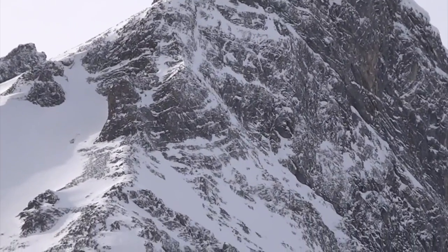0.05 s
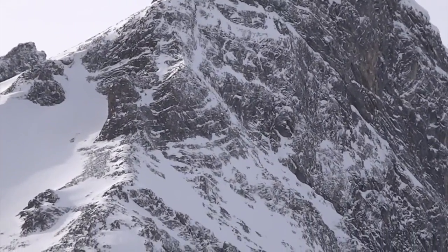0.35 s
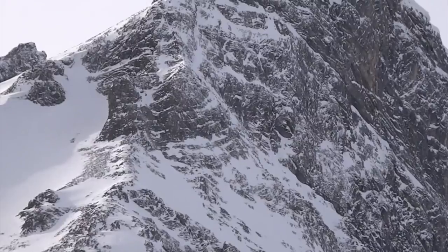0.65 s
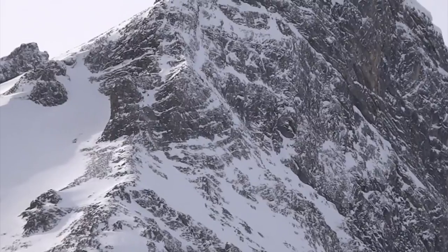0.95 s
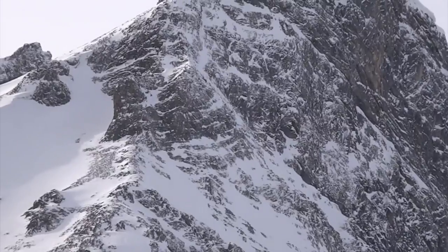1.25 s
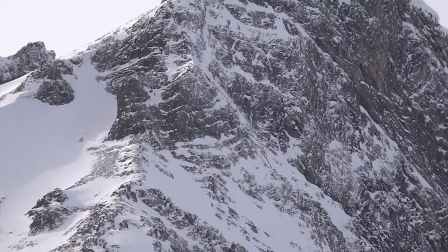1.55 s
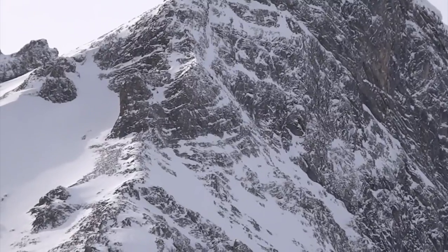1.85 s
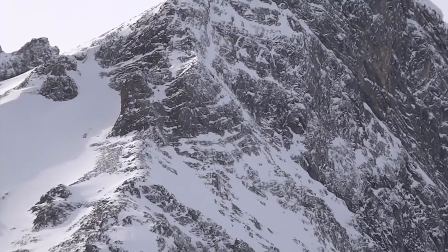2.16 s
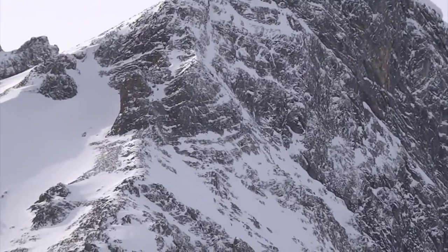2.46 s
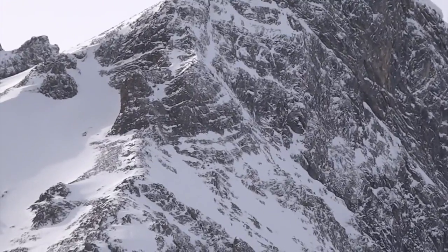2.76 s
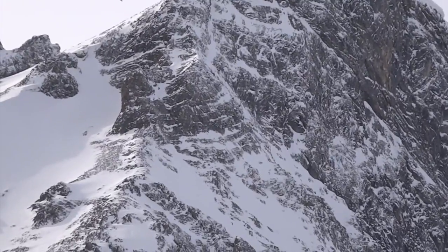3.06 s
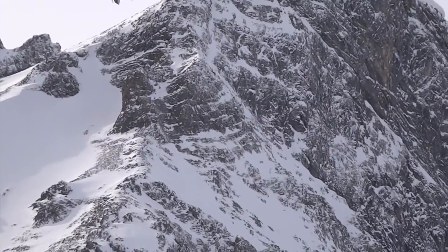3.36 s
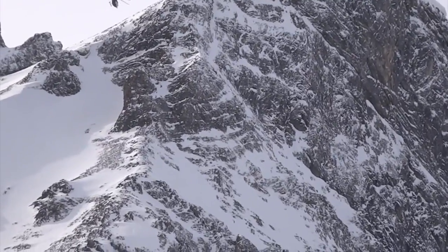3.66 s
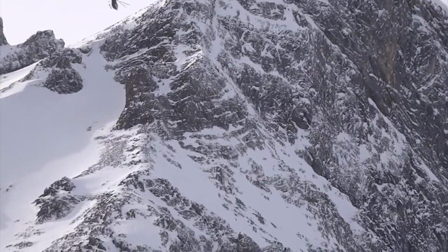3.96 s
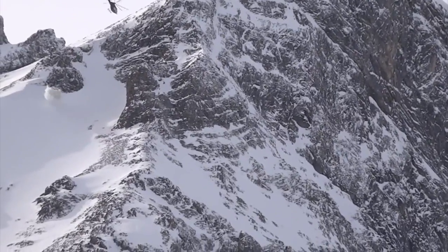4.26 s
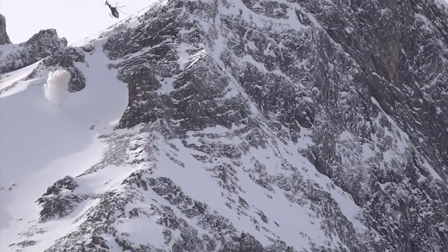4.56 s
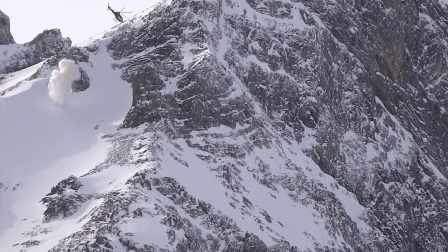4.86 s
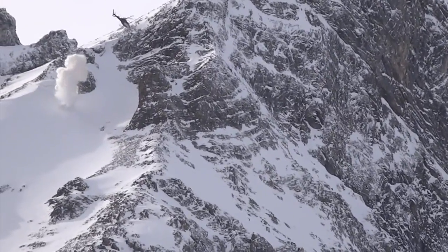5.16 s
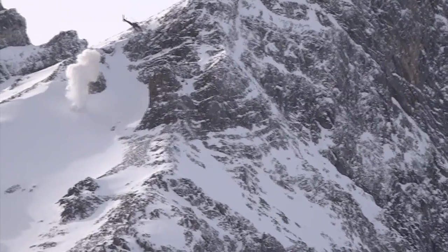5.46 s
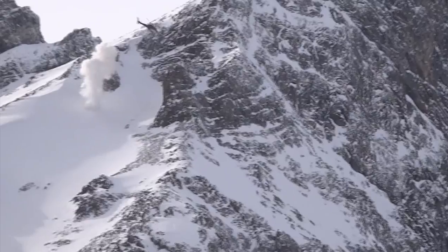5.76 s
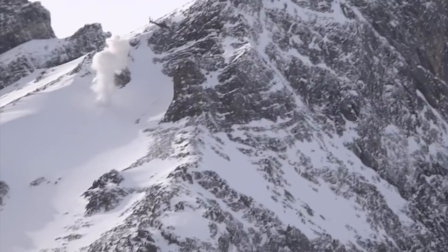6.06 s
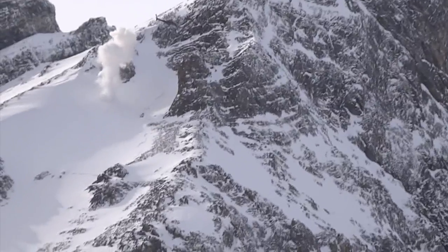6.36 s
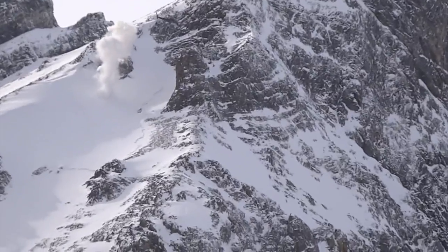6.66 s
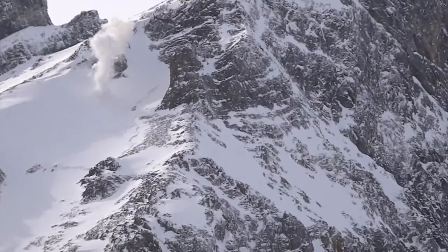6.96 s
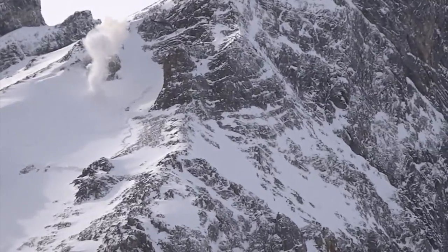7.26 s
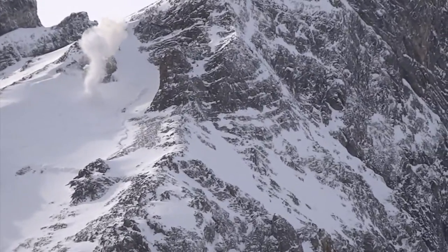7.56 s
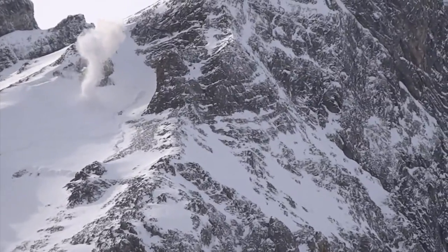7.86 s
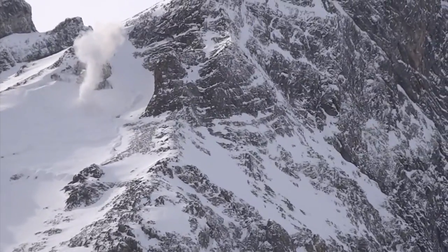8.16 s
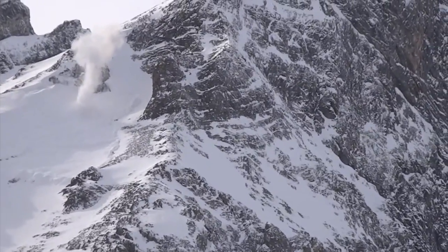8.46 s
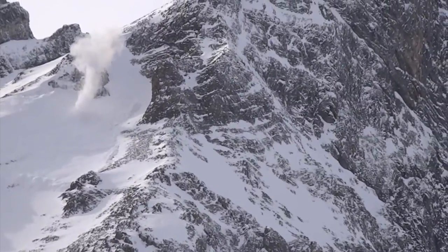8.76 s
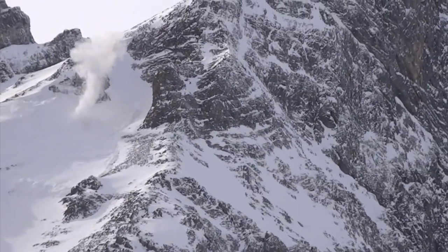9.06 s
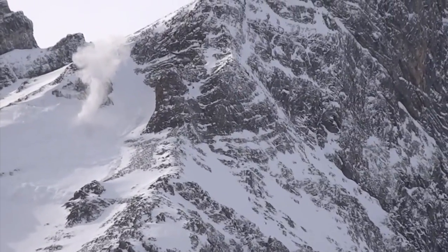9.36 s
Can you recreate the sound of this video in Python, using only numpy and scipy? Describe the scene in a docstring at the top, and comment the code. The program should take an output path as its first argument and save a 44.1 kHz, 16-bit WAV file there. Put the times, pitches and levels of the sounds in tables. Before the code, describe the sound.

From the start, wind rumbles and flutters on the microphone in open mountain air, with irregular low buffets and pops through the first eight seconds. A distant helicopter circles throughout, its rapid chopping roar carrying a soft swish that glides up and down. It swells at about 2.5 seconds, with blade slaps from 2.8 to 3.6, slaps again most clearly between 5.7 and 7.1, and recedes by 8. At about 8.3 seconds an explosive charge detonates on the slope, the loudest event: a sudden bang with a deep boom, thumps and a dull roll. At 8.8 a rock face throws back a bright, crackling echo in several quick surges, followed by small knocks and a fading rumble that continues to the end at around 9.6 seconds. A very faint camera whirr, hiss and thin whine lie underneath.

```python
"""Wind buffets the microphone while a distant helicopter circles over a snowy mountain.
Eddies press on the two microphone ports; the blades chop their own airflow noise and slap their wake.
Near the end an explosive charge goes off on the slope: the shock arrives, rolls dully over the snow,
and half a second later a rock face throws it back as a bright, crackling echo.
A limiter holds the blast down, and the camera's faint whirr, hiss and whine lie underneath."""
import sys
import numpy as np
from scipy import signal
from scipy.fft import rfft, irfft, next_fast_len
from scipy.io import wavfile
from scipy.ndimage import uniform_filter1d, map_coordinates

SR = 44100
rng = np.random.default_rng(int(sys.argv[2]) if len(sys.argv) > 2 else 0)


def transcribe(u):
    """Save the signal u as a 16-bit wav file named by the first command-line argument.

    u: samples, shape (n,) or (channels, n), limited to [-1, 1]; the rate is SR.
    q: integer samples, one column per channel.
    """
    v = np.clip(np.atleast_2d(u).T, -1, 1)
    q = np.round(v * 32767).astype(np.int16)
    wavfile.write(sys.argv[1], SR, q)


N = 424065
T = np.arange(N) / SR
BLAST_S = 8.268


def helicopter():
    """Amplitude modulation: each blade passage pulses the airflow noise, heard with slaps and tones."""
    # progress of the main rotor: time_s, passage_count
    blades = [(0, 0), (2.418, 46), (2.886, 55), (3.556, 68), (5.845, 112), (6.467, 124), (6.999, 134),
              (7.941, 152), (8.204, 157), (9.62, 184)]
    # loudness as it circles nearer and farther: time_s, roar_db, swish_db
    flight = [(0, -35, -57), (.6, -37.5, -56), (1.1, -37, -46.5), (1.6, -40.5, -51.5), (2.5, -31, -41.5),
              (3.1, -34.5, -47), (4.1, -40, -54), (5.1, -34, -48.5), (5.6, -33.5, -52), (6.1, -37.5, -47),
              (6.8, -34, -49.5), (7.2, -36.5, -48.5), (7.55, -39.5, -54), (8.1, -46.5, -50.5)]
    # spectra of the low roar and the higher swish: frequency_hz, level_db
    roar_tone = [(150, -4.5), (270, -27), (355, 1), (450, -7), (545, 0.5), (700, -6.5), (800, -10.5),
                 (870, -20), (1100, -30), (1600, -67.5)]
    swish_tone = [(600, -23), (850, -0.5), (930, 1), (1170, -7), (1290, -17.5), (1450, -21.5), (1680, -26),
                  (1800, -31.5), (2400, -49.5), (4000, -71)]
    passages = np.interp(T, *np.transpose(blades))
    roar_gain, swish_gain = levels(flight)
    chop = unit(1 + 0.3 * blade_gate(passages, width=0.15))
    roar = amp(0.5) * roar_gain * noise(roar_tone, side_db=-33.5)
    swish = amp(-1.5) * swish_gain * noise(swish_tone, side_db=-16)
    airflow = chop * (roar + swish + tip_swish() + banking_swish())
    tones = rotor_tones(passages)
    return slope_reflection(airflow) + wake_slaps(passages) + vortex_slaps() + tones


def tip_swish():
    """Directivity: the hiss of the blade tips swells when it is beamed towards the listener."""
    # swells: start_s, hold_s, level_db
    swishes = [(2.38, .6, -61.5), (4.854, 0.5, -67.5), (5.72, .25, -65.5)]
    # tip noise spectrum: frequency_hz, level_db
    tip_tone = [(1100, -11), (1330, -5.5), (1420, -9), (1560, 0), (1690, 4), (1800, -8), (2200, -18),
                (2700, -39)]
    gain = power_sum(swell(s, db, 0.1, hold_s, 0.15) for s, hold_s, db in swishes)
    return gain * noise(tip_tone, side_db=-12)


def banking_swish():
    """Band-pass noise: a soft spectral peak glides up and down as the helicopter banks."""
    # path of the peak: time_s, centre_hz, level_db
    glide = [(0, 698, -55), (.95, 810, -48.5), (1.249, 1200, -57), (1.65, 1114, -56), (2.05, 860, -51.5),
             (2.3, 960, -47.5), (2.5, 1155, -54.5), (3.4, 1100, -59.5), (4.3, 1047, -58), (4.9, 1580, -74),
             (5.65, 1697, -70), (6, 1460, -65.5), (6.2, 1306, -58), (6.45, 1028, -49.5), (6.75, 1340, -62),
             (7.1, 1400, -61), (7.6, 1500, -75)]
    s, hz, db = np.transpose(glide)
    air = ports(rng.standard_normal((2, N)), side_db=-15)
    return amp(np.interp(T, s, db)) * resonate(air, np.interp(T, s, hz), width_hz=230)


def rotor_tones(passages):
    """Scintillation: turbulent air makes the tones of both rotors fade and wander in phase."""
    # partials: blade_rate_multiple, level_db
    partials = [(2, -34.5), (3.05, -43), (4, -43.5), (7.04, -41), (10.56, -39), (14.08, -56), (17.6, -44.5)]
    tones = np.zeros(N)
    for multiple, db in partials:
        gain = amp(db + 3.2 * drift(per_s=4.6))
        cycles = multiple * passages + 0.094 * drift(per_s=6)
        tones += gain * np.sin(2 * np.pi * cycles)
    return tones


def slope_reflection(direct):
    """Comb filtering: sound interferes with its reflection off the snow, whose path slowly changes."""
    delay_s = 0.005 + 0.0012 * uniform_filter1d(drift(per_s=1.5), size=16384)
    reflected = np.array([np.interp(T - delay_s, T, port) for port in direct])
    return direct.std() * unit(direct + amp(-11) * reflected)


def wake_slaps(passages):
    """Multipath: a blade strikes its wake, and the pulse arrives by several paths in a turbulent puff."""
    # paths, direct and off the slopes: delay_blade_periods, level_db
    paths = [(-.05, -5.5), (0, -0.5), (.045, -4), (.11, -8.5)]
    # slap spectrum: frequency_hz, level_db
    slap_tone = [(60, -15), (250, -1.5), (350, 10.5), (440, 0), (550, 9), (720, 3.5), (850, -4.5),
                 (940, 1.5), (1150, -5), (1380, -25), (1620, -23.5), (1800, -32), (2100, -38), (3000, -70)]
    # bouts of slapping: start_s, hold_s, level_db
    bouts = [(2.787, 0.78, -40), (4.946, 0.14, -49), (5.68, 0.044, -35), (5.843, 0.24, -33.5),
             (6.1, 0.11, -32.5), (6.31, 0.22, -35), (6.89, 0.2, -37), (7.934, 0.054, -40.5),
             (8.192, .05, -37.5)]
    clicks = np.zeros(N)
    for delay, db in paths:
        arrived = np.floor(passages - delay + 0.0082 * drift(per_s=9))
        clicks += amp(db) * np.diff(arrived, prepend=0)
    puffs = amp(-6) * blade_gate(passages, width=0.09) * noise(slap_tone, side_db=-16.5)
    swells = [swell(s, db, 0.11, hold_s, 0.069) for s, hold_s, db in bouts]
    gain = amp(-2) * power_sum([amp(-47.5), *swells])
    return gain * (colour(clicks, slap_tone) + puffs)


def vortex_slaps():
    """Blade-vortex interaction: cutting a tip vortex sends a tiny shock, doubled by the ground."""
    # strikes: time_s, level_db
    strikes = [(3.042, -16), (5.682, -29), (5.845, -21), (5.895, -19), (5.948, -19), (5.997, -20),
               (6.103, -14), (6.154, -10.5), (6.206, -16), (6.312, -16), (6.412, -22), (6.516, -23),
               (6.837, -23), (6.949, -22), (6.998, -20), (7.942, -18), (7.994, -20), (8.202, -26)]
    length_s, cutoff_hz, ground_delay_s = 0.00026, 1150, 0.00269
    cracks = n_waves([(s, db, length_s, cutoff_hz) for s, db in strikes], order=8)
    return cracks + amp(-3) * np.interp(T - ground_delay_s, T, cracks)


def blast():
    """Shock propagation: the charge's N-waves arrive first, then the terrain returns their sound."""
    # shocks, direct and off the nearest slopes: start_s, level_db, overpressure_s, cutoff_hz
    shocks = [(8.2678, -7, 0.002, 1650), (8.2729, -0.5, 0.0025, 450), (8.283, -1.5, 0.0092, 300),
              (8.3145, -2.5, 0.0094, 250), (8.336, -4.5, 0.012, 302), (8.3492, -4, .00025, 1700),
              (8.353, -20.5, 0.00068, 5500), (8.369, -1.5, .017, 200), (8.4135, -3, 0.0087, 200),
              (8.487, -8.5, 0.011, 200), (8.8183, -9, 0.00027, 1790), (8.823, -7.5, 0.00039, 1980),
              (8.886, -12.5, .0004, 2860)]
    return (n_waves(shocks, order=2) + snow_roll() + rock_echoes() + crag_knocks()
            + shock_tearing() + terrain_thumps())


def snow_roll():
    """Reverberation: snow absorbs the treble, so slope and valley return a deep boom and a dull roll."""
    # spectra of boom and roll: frequency_hz, level_db
    boom_tone = [(8, -12), (22, -3), (36, 0), (60, -2), (100, -12), (300, -50), (1500, -120)]
    roll_tone = [(40, -2.5), (100, -3), (140, -4), (200, -1.5), (300, -7), (500, -9.5), (750, -14),
                 (1200, -25.5), (2000, -48), (3500, -65.5), (8000, -89.5)]
    boom = blast_decay(-14, rise_s=0.02, hold_s=0.14, t60_s=1.5) * noise(boom_tone, side_db=-12)
    slope = blast_decay(-7.5, rise_s=0.05, hold_s=0.1136, t60_s=2.1)
    valley = blast_decay(-34, rise_s=0.3, hold_s=0.38, t60_s=5.4)
    roll = power_sum([slope, valley]) * scatter(roll_tone, per_s=1500, spread_db=1, side_db=-20)
    return boom + roll


def rock_echoes():
    """Scattering: each rock face returns a rush of sharp little echoes as the front sweeps over it."""
    # echoes of the faces: peak_s, rush_db, crackle_db, rise_s, t60_s
    faces = [(8.3, -22, -35, .02, 0.61), (8.345, -22, -35, 0.017, 0.11), (8.502, -24, -30, 0.058, 0.094),
             (8.57, -29, -45, .05, .4), (8.715, -31.5, -52.5, 0.046, 0.41),
             (8.813, -12, -24.5, 0.015, 0.068), (8.883, -13.5, -22, 0.025, 0.081),
             (8.97, -19, -27, 0.06, 0.56), (9.03, -16, -25.5, 0.051, 0.47), (9.2, -27, -43.5, .12, 4.8)]
    # spectra of rush and crackle: frequency_hz, level_db
    rush_tone = [(40, 3.5), (150, -14.5), (330, 5.5), (520, 4.5), (800, -2.5), (1300, -7), (2000, -24),
                 (3000, -43), (4200, -62.5), (8000, -76)]
    crackle_tone = [(300, -32), (1300, 13), (2600, -0.5), (4000, -18.5), (6500, -30.5), (10000, -57),
                    (16000, -42.5)]
    rushes, crackles = [], []
    for s, rush_db, crackle_db, rise_s, t60_s in faces:
        fall_s = t60_s / np.log(1000)
        rushes.append(swell(s, rush_db, rise_s, 0, fall_s))
        crackles.append(swell(s, crackle_db, rise_s, 0, fall_s / 1.05))  # air absorbs treble sooner
    diffuse = blast_decay(-26, rise_s=1, hold_s=1, t60_s=4)
    rush = power_sum([diffuse, *rushes]) * scatter(rush_tone, per_s=6000, spread_db=2, side_db=-14.5)
    crackle = power_sum(crackles) * scatter(crackle_tone, per_s=4000, spread_db=3, side_db=-11)
    return (amp(-2) * rush + amp(-5.5) * crackle) * (T > BLAST_S)


def crag_knocks():
    """Discrete echoes: single crags each return one short knock."""
    # knocks: time_s, level_db, length_s, cutoff_hz
    knocks = [(8.274, -11.5, 0.0053, 1100), (8.298, -10, 0.0074, 1200), (8.325, -12.5, .006, 1300),
              (8.35, -14, 0.0037, 6000), (8.578, -9, 0.0059, 650), (9.033, -23, 0.0027, 3980),
              (9.068, -17, 0.0037, 800), (9.183, -17.5, 0.01, 650), (9.213, -15.5, 0.0042, 1800),
              (9.271, -20.5, .003, 4000), (9.325, -15.5, 0.0061, 1700), (9.444, -24, 0.0047, 1200),
              (9.589, -19.5, 0.0062, 650)]
    # knock spectrum: frequency_hz, level_db
    knock_tone = [(200, 2), (700, 10), (1600, -7.5), (2500, -14), (3800, -35), (6000, -45), (10000, -66)]
    crags = noise(knock_tone, side_db=-21.5)
    return sum(low_pass(bumps([(s, db, length_s)]) * crags, cutoff_hz, order=2)
               for s, db, length_s, cutoff_hz in knocks)


def shock_tearing():
    """Fine structure of a ragged shock: dense tiny impulses tear briefly behind the front."""
    # tears: time_s, level_db, length_s
    tears = [(8.282, -45, 0.029), (8.326, -45, 0.038)]
    # tearing spectrum: frequency_hz, level_db
    tear_tone = [(800, -5), (2000, 6), (4000, -7), (6500, -18), (10000, -24), (16000, -33)]
    return bumps(tears) * scatter(tear_tone, per_s=2800, spread_db=5, side_db=-15)


def terrain_thumps():
    """Low-frequency reflection: the terrain throws the blast back as separate thumps."""
    # thumps: time_s, level_db, length_s
    thumps = [(8.272, -8.5, 0.0086), (8.298, -6, 0.015), (8.385, -16, .012), (8.445, -8, 0.03),
              (8.49, -13, 0.017), (8.56, -15, 0.031), (8.632, -7.5, 0.036), (8.685, -12.5, 0.017),
              (8.732, -12, 0.026), (9.03, -22, 0.02), (9.385, -25, 0.017), (9.48, -24.5, 0.023)]
    # thump spectrum: frequency_hz, level_db
    thump_tone = [(50, -19.5), (120, 3), (175, 6.5), (220, -3.5), (300, -14), (700, -34.5), (2000, -87)]
    return bumps(thumps) * noise(thump_tone, side_db=-1)


def bright_spits():
    """Broadband transients: brief bursts of bright, clipping-like noise at the start of the blast."""
    # spit spectrum: frequency_hz, level_db
    spit_tone = [(2000, -15), (5000, -11), (8000, -8.5), (13000, -12), (16000, -9)]
    # spits: time_s, level_db, length_s
    spits = [(8.2682, -46, 0.0003), (8.278, -58, 0.012), (8.2875, -41.5, 0.0018)]
    return bumps(spits) * noise(spit_tone, side_db=-13)


def wind():
    """Turbulent pressure: large eddies press on both ports alike, small quick ones on each by itself."""
    # gusts: start_s, hold_s, strength_db
    gusts = [(0, 0.33, -24.5), (1.251, 0.23, -27), (2.722, 0.42, -27), (3.307, .74, -28.5),
             (3.762, 0.27, -29), (4.39, 1.2, -27), (5.957, .42, -29.5), (6.648, 0.19, -24.5),
             (7.336, 0.17, -28.5)]
    # the hardest buffets: time_s, level_db
    hard_buffets = [(0.147, -12.5), (1.326, -17.5), (1.458, -16.5), (1.492, -16), (1.628, -18.5),
                    (1.742, -19), (2.731, -22.5), (2.798, -16.5), (2.893, -14.5), (2.954, -24),
                    (3.018, -15), (3.291, -15.5), (3.34, -18.5), (3.372, -20.5), (3.406, -18), (3.752, -18),
                    (3.825, -16), (3.952, -15), (4.477, -17.5), (5.218, -20), (5.35, -12.5), (5.51, -19.5),
                    (5.722, -20), (5.983, -16), (6.27, -13), (6.637, -20.5), (6.74, -16), (6.848, -13),
                    (7.407, -19), (7.471, -14.5), (7.547, -22), (8.125, -19)]
    # eddies bursting right on the microphone: start_s, level_db, overpressure_s, cutoff_hz
    pops = [(.035, -9, 0.00092, 604), (.32, -12.5, 0.00092, 550), (1.451, -7, 0.0015, 516),
            (1.49, -9, 0.0035, 300), (1.739, -15.5, 0.0011, 520), (2.892, -10.5, 0.00076, 700),
            (2.952, -11, 0.0021, 350), (3.0915, -7, 0.00058, 746), (3.282, -8.5, 0.0024, 354),
            (3.403, -10, 0.00082, 680), (3.485, -8.5, 0.0016, 500), (4.477, -6, 0.0026, 350),
            (6.264, -9, 0.00186, 520), (6.46, -11.5, 0.0033, 400), (6.677, -13, 0.00073, 754),
            (6.835, -13.5, 0.00082, 694), (7.469, -9, 0.00079, 600), (7.546, -12.5, 0.0013, 520)]
    # spectra of rumble, flutter and buffets: frequency_hz, level_db
    rumble_tone = [(5, -27.5), (20, -4.5), (35, -1.5), (58, 6.5), (90, 1.5), (150, -12.5), (400, -70)]
    flutter_tone = [(30, -56), (90, -1.5), (170, -1.5), (260, -7.5), (400, -15), (800, -35), (1600, -53),
                    (4000, -94)]
    buffet_tone = [(25, -9), (90, 1), (180, 1.5), (290, -4.5), (450, -16), (800, -30.5), (1500, -56.5),
                   (3000, -74.5), (6000, -92)]
    breeze_db, buffet_s = -30, 0.02
    swells = [swell(s, db, 0.036, hold_s, 0.1) for s, hold_s, db in gusts]
    strength = power_sum([amp(breeze_db), *swells])
    # the rumble follows only a share of each gust's rise in dB
    rumble = amp(-28.5) * unit(strength ** 0.42) * noise(rumble_tone, side_db=-8.5)
    flutter = amp(-3 + 2.3 * drift(per_s=40)) * strength * noise(flutter_tone, side_db=-3)
    hard_gain = bumps([(s, db, buffet_s) for s, db in hard_buffets])
    buffet_gain = power_sum([hard_gain, strength * eddies(buffet_s, per_s=8)])
    buffets = amp(-3) * buffet_gain * noise(buffet_tone, side_db=0)
    return rumble + flutter + buffets + n_waves(pops, order=4)


def eddies(length_s, per_s):
    """Intermittency: the gain of the lesser buffets swells at uneven intervals and to uneven heights."""
    jitter, size = rng.random((160, 2)).T
    times_s = (np.arange(len(jitter)) + jitter) / per_s
    sizes_db = 1 + 4 * (2 * size - 1)
    return bumps([(s, db, length_s) for s, db in zip(times_s, sizes_db)])


def camera_noise():
    """Self-noise: the camera adds a wavering whirr, a broadband hiss and a thin whine."""
    # spectra of whirr and hiss: frequency_hz, level_db
    whirr_tone = [(1200, -12.5), (1780, -13), (1910, 0), (2080, -15.5), (2170, -10), (2380, -29.5),
                  (2490, -21.5), (2950, -40.5), (3190, -18.5), (3600, -39), (4100, -23.5), (4600, -48.5)]
    hiss_tone = [(100, 6.5), (2500, -0.5), (4600, -3), (6000, -0.5), (10000, -1.5), (16000, -4)]
    whine_hz = 15734
    whirr = amp(-65.5 + 1.2 * drift(per_s=5)) * noise(whirr_tone, side_db=0)
    hiss = amp(-72) * noise(hiss_tone, side_db=-6.5)
    whine = amp(-79) * np.sin(2 * np.pi * whine_hz * T)
    return whirr + hiss + whine


def amp(db):
    """Amplitude ratio of a level in decibels."""
    return 10 ** (np.asarray(db) / 20)


def unit(x):
    """Normalisation to rms 1."""
    return x / np.sqrt(np.mean(x ** 2) + 1e-20)


def power_sum(gains):
    """Incoherent addition: unrelated sounds add in power."""
    return np.sqrt(sum(g ** 2 for g in gains))


def levels(rows):
    """Interpolation in decibels: one gain curve for each level column of a timed table."""
    s, *columns = np.transpose(rows)
    return [amp(np.interp(T, s, db)) for db in columns]


def drift(per_s):
    """Random modulation of rms 1: straight lines join per_s random values a second."""
    knots = rng.standard_normal(2048)
    return unit(map_coordinates(knots, [T * per_s], order=1, mode="wrap"))


def blade_gate(passages, width):
    """Periodic envelope of rms 1 that peaks at every blade passage; width is in blade periods."""
    distance = abs((passages + 0.5) % 1 - 0.5)
    return unit(np.exp(-distance / width))


def bumps(rows):
    """Gaussian envelopes, one for each row of time_s, level_db, length_s."""
    gain = np.zeros(N)
    for s, db, length_s in rows:
        width_s = 0.6 * length_s + 0.00058
        near = slice(*np.searchsorted(T, [s - 10 * width_s, s + 10 * width_s]))
        gain[near] += amp(db) * np.exp(-((T[near] - s) / width_s) ** 2)
    return gain


def swell(start_s, db, rise_s, hold_s, fall_s):
    """Exponential growth up to start_s, a hold, then decay; rise_s and fall_s are time constants."""
    away = np.maximum((start_s - T) / rise_s, (T - start_s - hold_s) / fall_s)
    return amp(db) * np.exp(-np.clip(away, 0, 20))


def blast_decay(db, rise_s, hold_s, t60_s):
    """Reverberant envelope: it sets in with the blast, holds, then loses 60 dB every t60_s."""
    age_s = T - BLAST_S
    return np.clip(age_s / rise_s, 0, 1) * amp(db - 60 * np.maximum(age_s - hold_s, 0) / t60_s)


def colour(x, tone):
    """Spectral shaping by rows of frequency_hz, level_db; the result has rms 1."""
    hz, db = np.transpose(tone)
    size = next_fast_len(N + 8192)
    bins_hz = np.fft.rfftfreq(size, 1 / SR)
    response = amp(np.interp(np.log(bins_hz + 1), np.log(hz), db))
    return unit(irfft(rfft(x, size) * response, size)[..., :N])


def ports(pair, side_db):
    """Mid-side stereo: a shared signal and a difference signal become left and right."""
    side = amp(side_db) * pair[1]
    return np.array([pair[0] + side, pair[0] - side])


def noise(tone, side_db):
    """Coloured Gaussian noise at both ports."""
    return ports(colour(rng.standard_normal((2, N)), tone), side_db)


def scatter(tone, per_s, spread_db, side_db):
    """Shot noise: many small impulses of uneven size arrive at random moments."""
    size = amp(spread_db * np.minimum(rng.exponential(1, (2, N)), 4))
    polarity = rng.choice([-1, 1], (2, N))
    arrivals = rng.random((2, N)) < per_s / SR
    return ports(colour(size * polarity * arrivals, tone), side_db)


def low_pass(x, cutoff_hz, order):
    """Low-pass filtering takes away the treble above the cutoff."""
    return signal.sosfilt(signal.butter(order, cutoff_hz, fs=SR, output="sos"), x + 1e-18)


def n_waves(rows, order):
    """N-waves: pressure jumps up, falls through suction and returns; a low-pass rounds the edge."""
    pressure = np.zeros(N)
    for s, db, overpressure_s, cutoff_hz in rows:
        near = slice(*np.searchsorted(T, [s, s + 0.1]))
        progress = (T[near] - s) / overpressure_s
        wave = (1 - progress) * np.exp(-np.minimum(progress / 2, 2) ** 6)
        pressure[near] += amp(db) * low_pass(wave, cutoff_hz, order)
    return pressure


def resonate(x, hz, width_hz):
    """Moving resonance of rms 1: shift down by the curve hz, smooth, and shift back up."""
    carrier = np.exp(2j * np.pi * np.cumsum(hz) / SR)
    pole = np.exp(-np.pi * width_hz / SR)
    baseband = signal.lfilter([1], [1, -2 * pole, pole * pole], x / carrier)
    return unit((carrier * baseband).real)


def limiter(x):
    """Gain reduction: it lets go quickly after a peak and slowly after a loud stretch."""
    def held(over_db, release_db_per_s):
        """Peak hold: the excess level drains at a steady rate."""
        release_db = release_db_per_s * T
        return np.maximum(np.maximum.accumulate(over_db + release_db) - release_db, 0)
    ceiling_db, loud_db, average_s = -3, -10.5, 0.04
    peak_db = 20 * np.log10(abs(x).max(0) + 1e-9)
    pole = np.exp(-1 / (average_s * SR))
    power = signal.lfilter([1 - pole], [1, -pole], (x ** 2).mean(0))
    power_db = 10 * np.log10(power + 1e-12)
    fast_db = held(peak_db - ceiling_db, release_db_per_s=150)
    slow_db = held(power_db - loud_db, release_db_per_s=5)
    down_db = np.maximum(fast_db, slow_db)
    return x / amp(uniform_filter1d(uniform_filter1d(down_db, size=60), size=40))


def scene():
    """Superposition: all sources add at the two ports, the wind a little stronger on the right."""
    wind_balance = amp([[-0.5], [0.5]])
    return camera_noise() + helicopter() + wind() * wind_balance + blast() + bright_spits()


def record(dry):
    """Limiting of level and bandwidth: the blast is held down, then the highest treble is cut."""
    cutoff_hz = 15900
    taps = signal.firwin(1023, cutoff_hz, window=("kaiser", 9), fs=SR)
    return signal.oaconvolve(limiter(dry), taps[None], "same")


dry = scene()
out = record(dry)
transcribe(out)
```